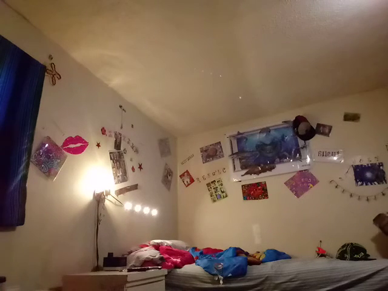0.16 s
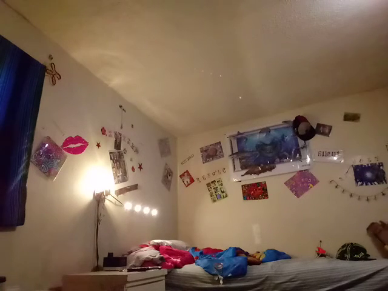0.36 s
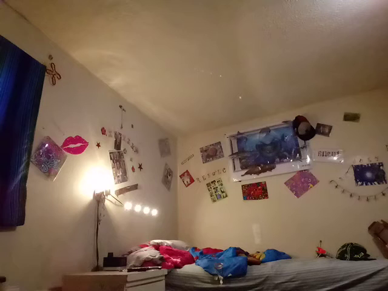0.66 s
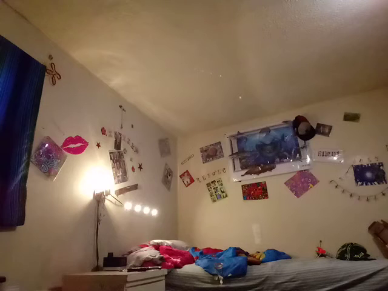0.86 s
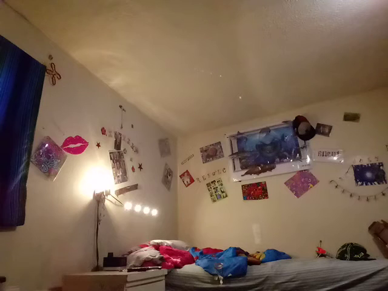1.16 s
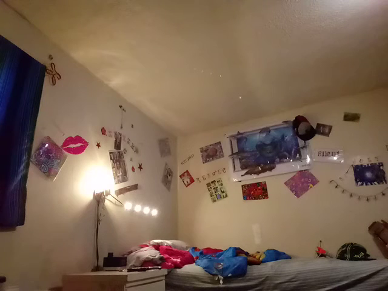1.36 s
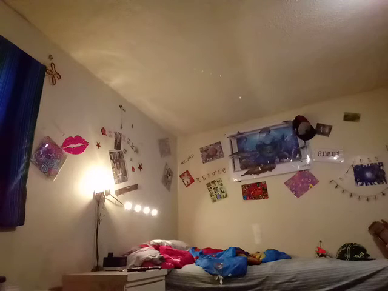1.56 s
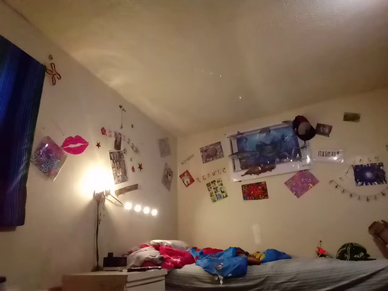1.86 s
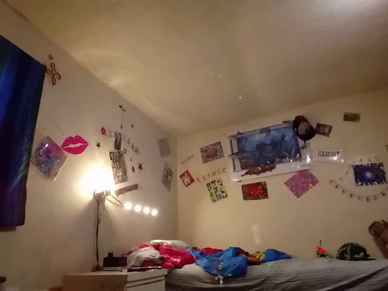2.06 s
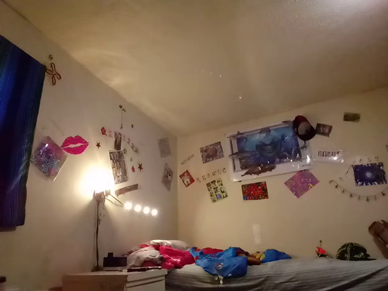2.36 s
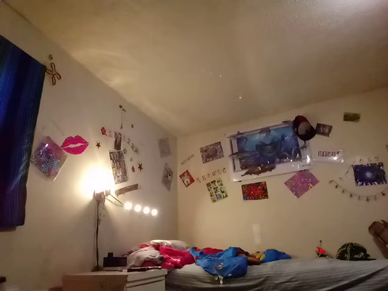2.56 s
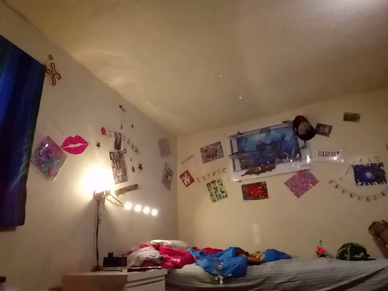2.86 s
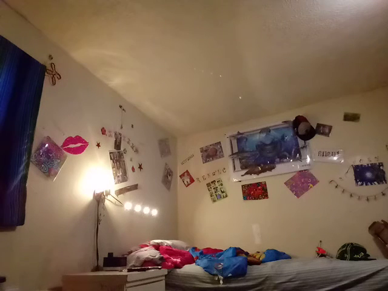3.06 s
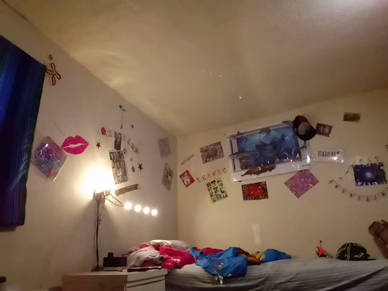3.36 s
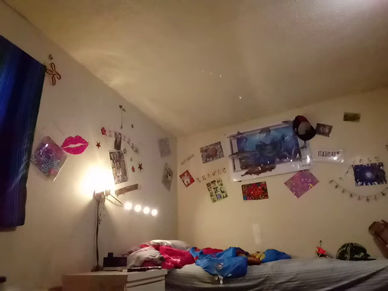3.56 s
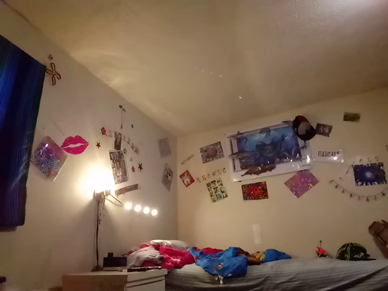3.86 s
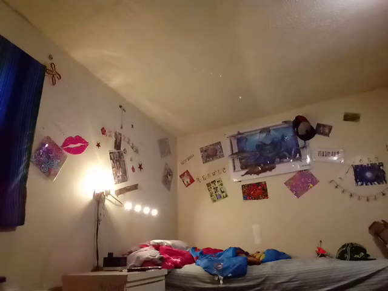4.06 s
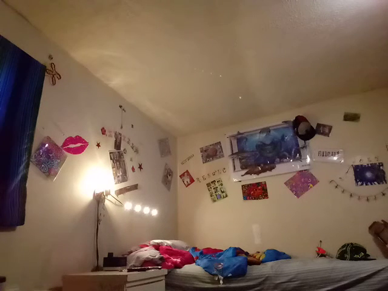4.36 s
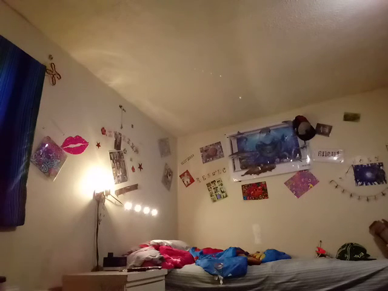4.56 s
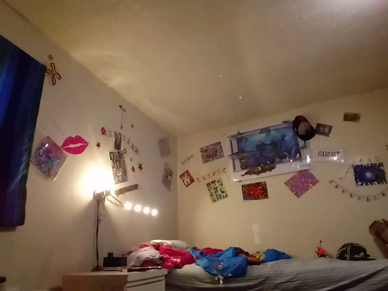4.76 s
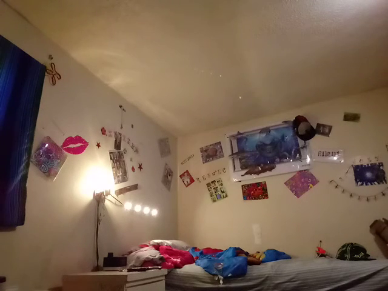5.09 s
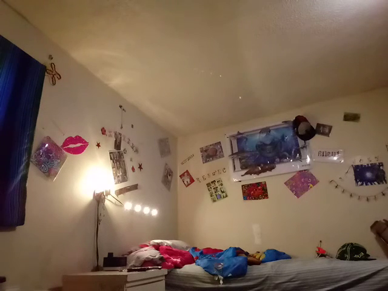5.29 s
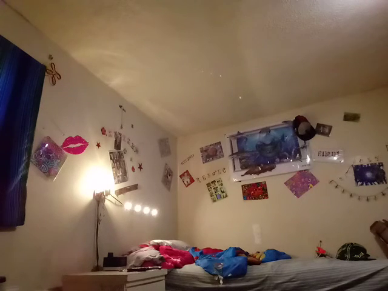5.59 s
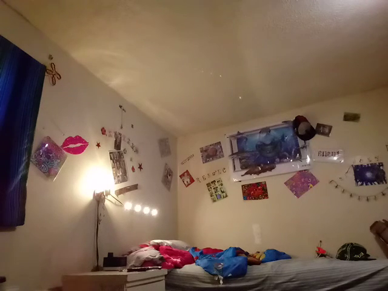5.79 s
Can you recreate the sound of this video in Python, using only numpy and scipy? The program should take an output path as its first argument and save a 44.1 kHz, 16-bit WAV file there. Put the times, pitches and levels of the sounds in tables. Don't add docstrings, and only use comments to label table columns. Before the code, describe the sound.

Wooden and plastic things are handled out of sight in a furnished bedroom. Dry, woody knocks come in irregular clusters at the start, middle and end, with low thuds carried through the floor, small scrapes, and tiny squeaks and ticks between. The middle is sparse and quiet. A small, dull microphone adds steady hiss, low hum and a faint high whine.

```python
import sys
import numpy as np
from scipy import signal
from scipy.fft import rfft, irfft, next_fast_len
from scipy.io import wavfile
from scipy.ndimage import uniform_filter1d

SR = 44100
rng = np.random.default_rng(int(sys.argv[2]) if len(sys.argv) > 2 else 0)


def elevation(decibels):
    levels = np.asarray(decibels, float)
    return 10 ** (levels / 20)


def digitize_waveform(pressure):
    field = np.atleast_2d(pressure).T
    bounded = np.clip(field, -1, 1)
    quanta = np.round(bounded * 32767).astype(np.int16)
    wavfile.write(sys.argv[1], SR, quanta)


N = 261557
SIZE = 1 << 14


def shape(x, table):
    hz, db = np.transpose(table)
    size = next_fast_len(len(x))
    f = np.maximum(np.arange(size // 2 + 1) * SR / size, 1)
    gain = elevation(np.interp(np.log(f), np.log(hz), db))
    return irfft(rfft(x, size) * gain, size)[:len(x)]


def band(x, lo_hz, hi_hz):
    return signal.sosfilt(signal.butter(2, [lo_hz, hi_hz], "band", fs=SR, output="sos"), x)


def ring(x, hz, width_hz):
    return signal.lfilter(*signal.iirpeak(hz, hz / max(width_hz, 3), fs=SR), x)


def unit(x):
    return x / np.sqrt(uniform_filter1d(x ** 2, size=220, axis=-1).max(axis=-1, keepdims=True))


def add(out, start_s, x):
    i = int(start_s * SR)
    out[i:i + len(x)] += x[:N - i]


def walk(rate_hz):
    k = int(SR / rate_hz)
    held = np.repeat(rng.standard_normal(N // k + 1), k)
    return 1.1 * uniform_filter1d(uniform_filter1d(held, k), k)[:N]


# hz, density_db
FLOOR = [(15, -51), (25, -18.5), (118, 1), (238, -4.5), (399, -11.5), (1030, -17.5), (4020, -22.5),
         (4860, -14.5), (5720, -31), (6920, -35.5), (8140, -23.5), (9400, -26.5), (10700, -39),
         (13600, -39), (15200, -23.5), (16500, -59)]
# pitch_hz, level_db
HUM = [(238, -70), (120, -97), (1076, -102)]


def background():
    t = np.arange(N) / SR
    tone = shape(rng.standard_normal(N), FLOOR)
    hiss = tone
    for lo_hz in (300, 600, 1200, 2400):
        swell = elevation(3 * walk(5)) - 1
        hiss = hiss + band(tone, lo_hz, 2 * lo_hz) * swell
    hiss = hiss / hiss.std() * elevation(-60.3 + 0.6 * walk(3))
    hum = np.sqrt(2) * sum(elevation(db + walk(6.46)) * np.sin(2 * np.pi * hz * t) for hz, db in HUM)
    frame_hz, whine_hz, whine_db = 60, 8080, -70
    pulse = np.clip(0.23 + 1.37 * np.sin(2 * np.pi * frame_hz * t), 0, 1)
    phase = 2 * np.pi * np.cumsum(whine_hz + 45 * walk(frame_hz)) / SR
    return hiss + hum + elevation(whine_db) * np.sin(phase) * pulse


def contact(rise_s, length_s, grain_db, t60_s):
    t = np.arange(SIZE) / SR
    force = np.minimum(t / max(rise_s, .0003), 1) ** 2 * np.exp(-t / max(length_s, .001))
    grains = rng.standard_normal(SIZE) * elevation(grain_db * rng.exponential(size=SIZE))
    keep = elevation(-120 / (t60_s * SR))
    stored = signal.lfilter([1 - keep], [1, -keep], force ** 2)
    answer = rng.standard_normal(SIZE) * np.sqrt(stored) * np.clip(t / 0.0027, 0, 1)
    return force * grains / grains.std() + elevation(1) * answer


# pitch_hz, width_hz, level_db
FURNITURE = [(330, 40, -2), (380, 40, -4), (505, 45, -4), (695, 45, -2), (781, 45, -1), (854, 45, -3),
             (941, 45, -1), (1106, 45, -1), (1257, 45, -1), (1400, 50, -3), (1451, 50, -2), (1590, 55, -4),
             (1747, 60, -4), (1860, 60, -4), (2057, 60, -4), (2471, 60, -4), (2607, 60, -4), (2848, 70, -4),
             (3600, 90, -4), (4300, 100, -4)]


def furniture(x, uneven_db=0):
    strike_db = uneven_db * rng.standard_normal(len(FURNITURE))
    modes = 0
    for k, (hz, width_hz, db) in enumerate(FURNITURE):
        modes = modes + (-1) ** k * elevation(db + strike_db[k]) * ring(x, hz, width_hz)
    return x + elevation(-4.5) * modes


def blows(table, rise_s, length_s, edge_rise_s, edge_length_s):
    out = np.zeros(N)
    for start_s, db, hz, hard_db, edge_db in table:
        body = furniture(contact(rise_s, length_s, grain_db=3, t60_s=0.28), uneven_db=1.5)
        width_hz = 0.49 * hz
        own_ring = ring(ring(body, hz, width_hz), hz, width_hz)
        mid = elevation(-6) * band(band(body, 497, 3510), 710, 1990) + own_ring
        hard = unit(band(body, 1970, 2740))
        add(out, start_s, elevation(db - 10) * (unit(mid) + elevation(hard_db) * hard))
        edge = contact(edge_rise_s, edge_length_s, grain_db=5, t60_s=0.28)
        bright = unit(band(edge, 2850, 7240)) + elevation(-4) * unit(band(edge, 9000, 18000))
        add(out, start_s, elevation(edge_db - 10) * bright)
    return out


# start_s, peak_db, ring_hz, hard_db, edge_db
CLUNKS = [
    (0.038, -11.5, 1164, -33, -19.5),
    (0.157, -25.5, 890, -17, -33),
    (1.182, -38, 620, -1.5, -63),
    (1.52, -58, 1180, -5.5, -43),
    (2.668, -39.5, 1360, -9, -49),
    (2.687, -39, 1040, -15, -41),
    (3.054, -46, 1630, -11, -40.5),
    (3.1, -49.5, 700, -10, -42.5),
    (4.409, -45, 883, -7, -36),
    (5.407, -34.5, 990, -39, -43.5),
]


def clunks():
    return blows(CLUNKS, rise_s=.005, length_s=.013, edge_rise_s=.006, edge_length_s=.015)


# start_s, peak_db
SNAPS = [(0.038, -34.5), (0.155, -42), (0.492, -45), (1.52, -52), (3.312, -46), (4.05, -50), (0.229, -44),
         (1.13, -38.5), (2.939, -53), (3.421, -29.5), (4.439, -44.5), (5.288, -43.5)]


def snaps():
    out = np.zeros(N)
    for start_s, db in SNAPS:
        snap = contact(rise_s=0.0054, length_s=0.0055, grain_db=6, t60_s=0.16)
        add(out, start_s, elevation(db + 7.5) * unit(band(snap, 5970, 16140)))
    return out


def soft_push():
    t = np.arange(SIZE // 2) / SR
    return rng.standard_normal(len(t)) * t / .008 * np.exp(-t / 0.013)


# start_s, peak_db
SWAYS = [(0.039, -44), (0.108, -52), (0.347, -45), (0.425, -52), (0.503, -36), (1.181, -46), (1.594, -45),
         (1.818, -52), (3.434, -51), (3.468, -35.5), (3.493, -34), (3.551, -41), (4.206, -42), (4.417, -43),
         (4.502, -48), (1.21, -67), (4.6, -45), (4.74, -62), (4.873, -43), (5.45, -56)]


def sways():
    out = np.zeros(N)
    for start_s, db in SWAYS:
        add(out, start_s, elevation(db) * unit(ring(ring(soft_push(), 50, 31), 58, 30)))
    return out


def booms(table, t60_s):
    out = np.zeros(N)
    width_hz = np.log(1000) / np.pi / t60_s
    for start_s, db, hz, hollow_db in table:
        push = soft_push()
        partners = ring(push, 1.45 * hz, 2.7 * width_hz) + ring(push, 0.655 * hz, width_hz)
        boom = ring(push, hz, width_hz) + elevation(-9.5) * partners
        hollow = unit(band(furniture(push), 330, 890))
        low = unit(band(boom, 0.58 * hz, 1.57 * hz))
        add(out, start_s, elevation(db) * (low + elevation(hollow_db) * hollow))
    return out


# start_s, peak_db, pitch_hz, hollow_db
THUDS = [(0.04, -25.5, 166, -28), (0.108, -23, 176, -2.5), (0.162, -33, 192, 1), (0.235, -39, 188, -23),
         (0.347, -37, 289, -26), (0.425, -30, 168, -2), (0.46, -31.5, 167, -17), (0.539, -38, 175, 4),
         (0.881, -49, 170, -3), (1.151, -37, 177, -2.5), (1.2, -37, 118, -15), (1.595, -32, 137.6, -19),
         (1.648, -40.5, 104, -16), (1.699, -40.5, 168, -14), (1.818, -46, 98, -10),
         (2.699, -46.5, 149, -0.5), (3.32, -46, 192, -8), (3.495, -23.5, 131, -17), (3.525, -31, 112, -29),
         (3.04, -67, 250, 8), (4.419, -39, 225, -5.5), (4.448, -33.5, 166, -6), (4.501, -24, 156.4, -4),
         (4.871, -34, 165, -4), (4.939, -54.5, 286, 13.5), (1.0, -73, 70, -27), (5.419, -35, 165, -5),
         (5.459, -41.5, 133, 0.5)]


def thuds():
    return booms(THUDS, t60_s=0.1)


# start_s, peak_db, ring_hz, hard_db, edge_db
KNOCKS = [(0.119, -17.5, 1010, -17, -30), (0.234, -29, 740, -26, -32), (0.444, -23, 1040, -25, -42),
          (0.477, -29, 830, -5, -31), (0.494, -13, 1680, -13.5, -21.5), (0.843, -46.5, 1050, -12, -71),
          (0.962, -59, 1260, -16, -60), (2.095, -66, 980, -18, -51.5), (2.751, -43.5, 690, -3.5, -40.5),
          (3.457, -17, 1670, -4.5, -22), (4.117, -50.5, 1810, -23, -38), (4.505, -18.5, 940, -52, -29.5),
          (4.864, -32.5, 1015, -52, -50), (5.292, -18, 695, -33, -28.5), (5.456, -36.5, 1030, -33, -46),
          (0.299, -29, 1020, -26, -39), (0.348, -27, 1050, -39, -36), (0.423, -30, 950, -31, -40.5),
          (4.813, -40, 1090, 2, -44.5), (4.91, -35.5, 1160, -21, -59)]


def knocks():
    return blows(KNOCKS, rise_s=.004, length_s=.006, edge_rise_s=.006, edge_length_s=.01)


# start_s, peak_db, pitch_hz, hollow_db
BUMPS = [
    (0.295, -26.5, 156.6, -7),
    (0.501, -31.5, 153, -2.5),
    (1.183, -32.5, 283, -3),
    (3.433, -25.5, 180, -2.5),
    (3.469, -28, 340, -1),
    (4.541, -37, 169, 7),
    (4.91, -31.5, 167, -4),
    (5.293, -16.5, 206, -3.5),
    (5.303, -18.5, 179, -10.5),
    (5.337, -32, 190, -12),
]


def bumps():
    return booms(BUMPS, t60_s=0.038)


# start_s, length_s, level_db, bright_db, low_db
SCRAPES = [(0.555, 0.42, -41.5, -2.5, -1.5), (0.833, 0.089, -68.5, -14, 26.5),
           (1.084, 0.17, -44.5, -2, -24), (1.55, 0.44, -62.5, -2, 20.5), (2.08, 0.18, -47, 2, -25),
           (2.17, 0.13, -60, 9, 13), (2.45, 0.25, -71, 24, -3), (2.784, 0.54, -50.5, 10, -19),
           (3.115, 0.57, -52.5, -3, 2), (3.627, 0.32, -49.5, 10, -1.5), (4.113, 0.23, -45, -2, -13),
           (4.238, 0.26, -55, 9, 11), (4.72, .14, -62, -16, 18), (5.0, .16, -46, -8, -10),
           (5.11, 0.23, -32.5, -1, -8.5), (5.482, 0.092, -66, 10, 26)]


def scrapes():
    t = np.arange(N) / SR
    slips = rng.standard_normal(N) * elevation(2.2 * rng.exponential(size=N) + 0.5 * walk(29.06))
    body = furniture(slips)
    bright = band(band(body, 3100, 10500), 1800, 7000)
    parts = [band(body, 650, 1680), bright, band(slips, 110, 330)]
    gains = np.zeros((3, N))
    for start_s, length_s, db, bright_db, low_db in SCRAPES:
        done = (t - start_s) / length_s
        stroke = np.clip(np.minimum(done / 0.4, (1 - done) / 0.9), 0, 1)
        gains += stroke * elevation(db + np.array([[0], [bright_db], [low_db]]))
    return elevation(-21) * sum(g * p / p.std() for g, p in zip(gains, parts))


# start_s, pitch_hz, level_db, length_s
PINGS = [(1.45, 4810, -59, 0.022), (1.459, 1185, -66, 0.017), (1.515, 2850, -66, 0.014),
         (2.11, 4350, -66.5, 0.019), (4.816, 1060, -52, .012), (2.504, 3630, -68.5, .02),
         (2.253, 1140, -80, 0.36), (2.517, 1750, -73, 0.032), (2.53, 2950, -78, .03),
         (2.683, 2915, -54.5, 0.014), (2.953, 3750, -63.5, 0.053), (3.046, 2000, -62, 0.039),
         (3.077, 927, -67, .1), (3.187, 1750, -65, 0.035), (3.672, 1394, -62.5, 0.034),
         (3.673, 2540, -64, 0.021), (3.679, 704.5, -67, 0.084), (3.751, 3720, -64, 0.011),
         (3.77, 1480, -66.5, 0.05), (3.784, 800, -71, 0.096), (4.048, 4220, -58.5, 0.042),
         (4.442, 4210, -54, 0.012), (4.451, 1840, -46, 0.01), (5.118, 1060, -53, 0.028),
         (5.19, 869, -51, 0.13), (5.199, 1244, -57, 0.031), (0.848, 1030, -54, 0.0064),
         (0.967, 1220, -57, 0.0083), (4.833, 2420, -58, 0.0084), (5.41, 1005, -35.5, 0.0062),
         (5.411, 685, -45.5, 0.018)]


def squeaks():
    out, t = np.zeros(N), np.arange(SIZE // 2) / SR
    for start_s, hz, db, length_s in PINGS:
        unsteady = unit(ring(rng.standard_normal(len(t)), hz, 79))
        tone = 0.36 * np.sin(2 * np.pi * hz * t) + 0.41 * unsteady
        fade = np.minimum(t / 0.00053, 1) * np.exp(-(t / length_s) ** 2)
        add(out, start_s, elevation(db + 17.5) * tone * fade)
    return out


# start_s, peak_db, ring_hz, hard_db, edge_db
SHOVES = [
    (1.131, -31.5, 1350, -46, -31),
    (2.185, -46, 880, -12, -59),
    (2.941, -48, 1310, -18, -47),
    (3.308, -32, 710, -16, -25.5),
    (3.418, -21, 1290, 4, -23),
]


def shoves():
    return blows(SHOVES, rise_s=.012, length_s=.02, edge_rise_s=.009, edge_length_s=.014)


# start_s, peak_db, ring_hz, hard_db, edge_db
RATTLES = [
    (3.017, -46, 1490, -24, -39.5),
    (3.334, -40, 820, -1.5, -31.5),
    (4.046, -40.5, 1840, -7, -34),
    (4.439, -35, 730, -1, -47),
]


def rattles():
    return blows(RATTLES, rise_s=.005, length_s=.03, edge_rise_s=.007, edge_length_s=.022)


# hz, t60_s
ROOM_T60 = [(100, 0.33), (400, 0.29), (1200, 0.25), (3500, 0.12), (9000, 0.14)]


def room(x):
    t = np.arange(SIZE * 2) / SR
    hz, t60_s = np.transpose(ROOM_T60)
    edges_hz = np.r_[20, np.sqrt(hz[1:] * hz[:-1]), 18000]
    noise = rng.standard_normal(len(t))
    tail = sum(band(noise, lo, hi) * elevation(-60 * t / d) for lo, hi, d in zip(edges_hz, edges_hz[1:], t60_s))
    spread = rfft(tail)
    tail = irfft(spread / np.sqrt(uniform_filter1d(abs(spread) ** 2, size=20) + 1e-9), len(t))
    tail = tail * (t < t[-1] / 2) * np.clip((t - .002) / 0.01, 0, 1)
    return x + elevation(1.2) * signal.fftconvolve(x, tail / np.sqrt(np.sum(tail ** 2)))[:N]


# hz, gain_db
MIC = [(40, 0), (300, 6), (4800, 1), (5300, -5.5), (5750, -21.5), (6300, -11.5), (7100, -26), (8100, -16.5),
       (9400, -18), (10500, -25.5), (13600, -30.5), (15300, -29.5)]


def microphone(x):
    return shape(x, MIC)


def scene():
    struck = clunks() + snaps() + knocks() + shoves() + rattles()
    low = elevation(-10.5) * (sways() + thuds() + bumps())
    thin = elevation(-8) * squeaks()
    airborne = room(elevation(-9.5) * low + elevation(-4) * thin + scrapes())
    heard = elevation(0.5) * struck + elevation(-1.5) * low + thin + airborne
    return (microphone(heard) + background())[None]


def low_pass(x):
    return signal.sosfilt(signal.butter(12, 16810, fs=SR, output="sos"), x)


def record(dry):
    return low_pass(dry)


dry = scene()
out = record(dry)
digitize_waveform(out)
```